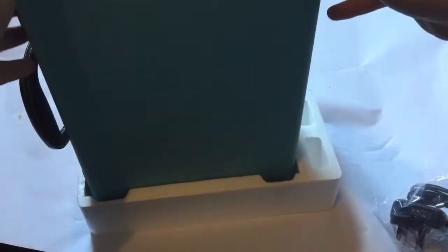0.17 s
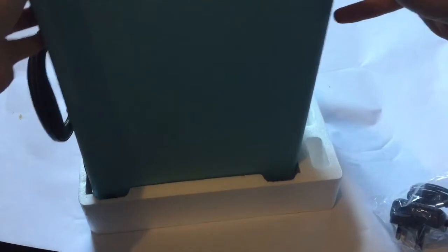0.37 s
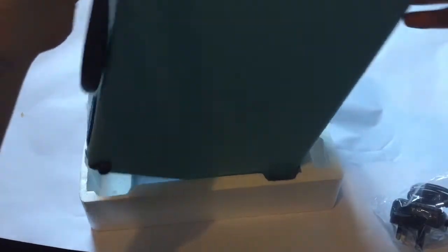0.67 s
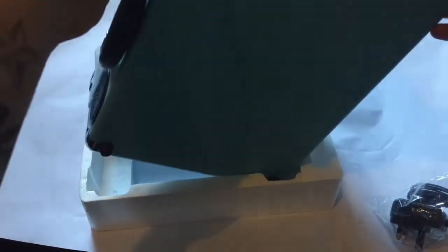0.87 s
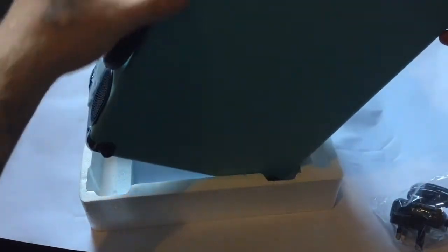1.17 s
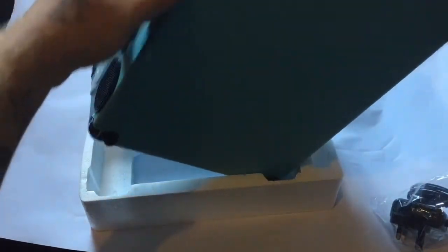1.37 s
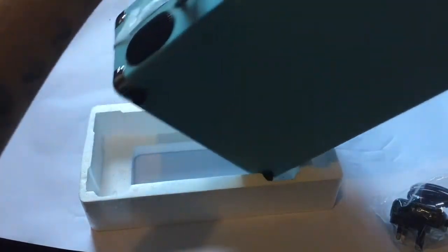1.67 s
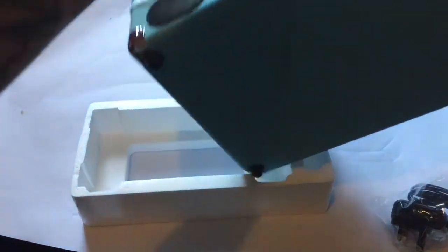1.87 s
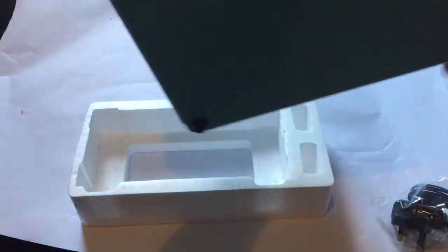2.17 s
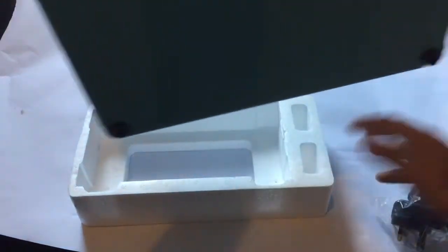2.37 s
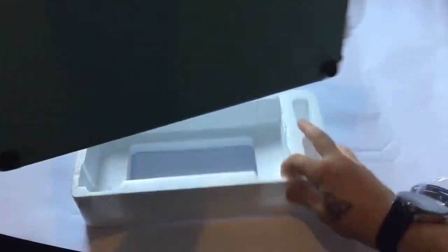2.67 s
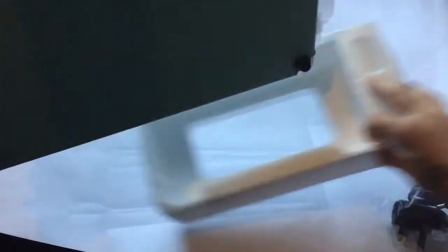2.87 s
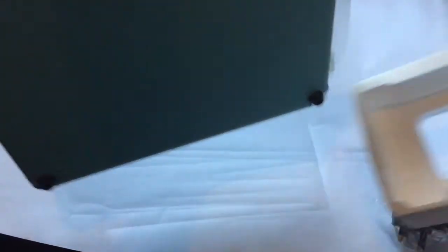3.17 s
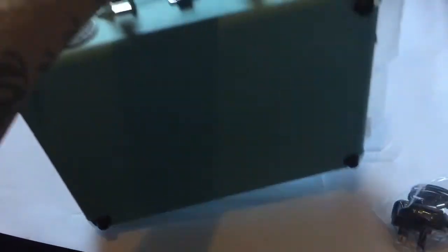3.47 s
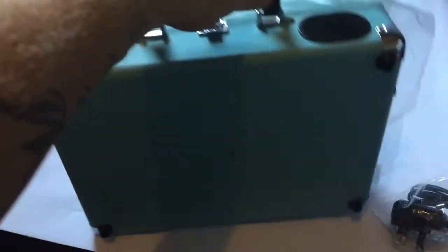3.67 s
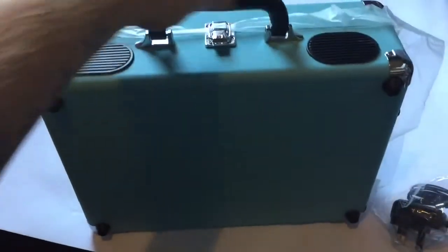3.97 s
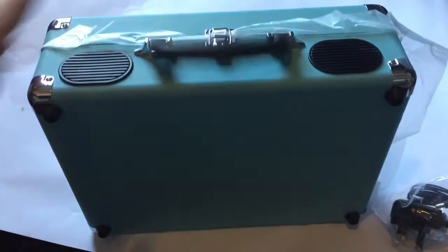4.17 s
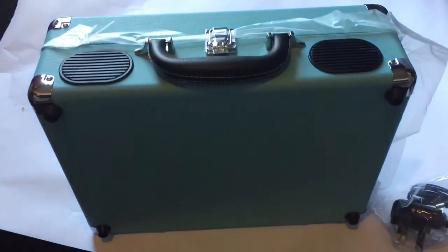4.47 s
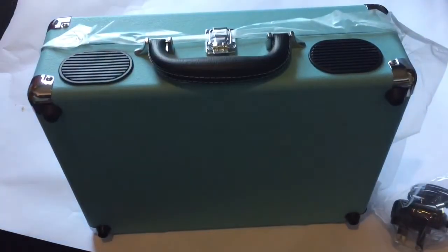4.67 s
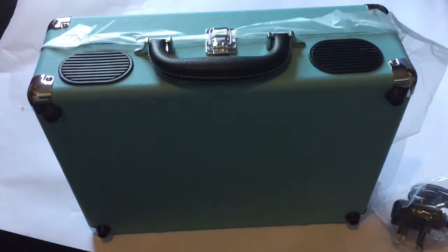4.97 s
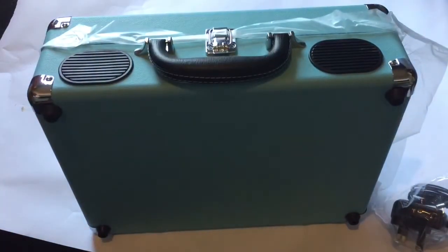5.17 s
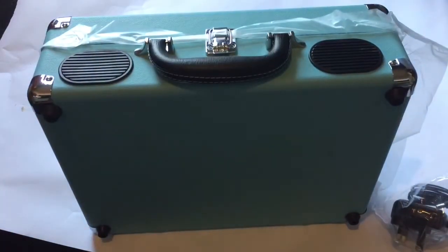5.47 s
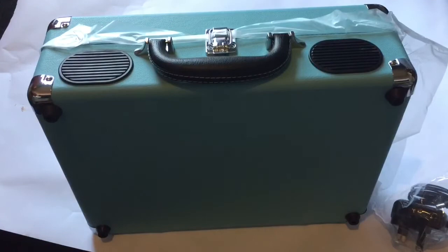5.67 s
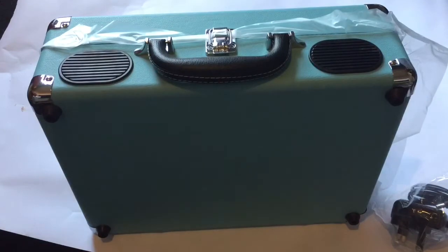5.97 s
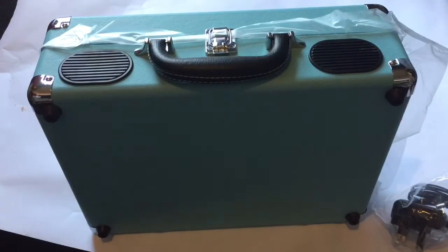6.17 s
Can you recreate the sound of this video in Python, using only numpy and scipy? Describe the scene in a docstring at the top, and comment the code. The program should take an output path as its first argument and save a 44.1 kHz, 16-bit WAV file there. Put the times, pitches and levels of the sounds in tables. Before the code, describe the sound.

Close indoor sound with a short, dull room echo and faint steady bass-heavy noise. Tiny ticks start at once; from 0.3 to 0.8 s a hand sweeps along a hard case, a breathy hiss swelling to about 0.6 s. Low hollow creaks and dry foam rubbing follow from 0.9 to 1.7 s, with bright double cracks near 1.3 and a short knock at 1.5. Around 1.8 to 1.93 s a corner slips free: a loud, piercing squeak, stepping upward and turning raspy. A quieter gap, then a crack, thump and swish near 2.7, a sharp tap at 2.95 and more rubbing. From 3.5 to 4.1 s the case is set down with knocks and a low creaky rumble. At 4.28 s the handle drops with a loud, hard woody clack, rebounding until 4.48. Sparse taps follow, then a soft brush and creak at 5.2 to 5.3, and dull bassy thumps near 5.25 and, stronger, 5.5 s; afterwards only faint noise.

```python
"""A hard case is tilted out of a foam tray on a paper-covered table; small ticks and thumps run throughout.
First a hand sweeps along the case (hiss), the hollow case creaks (slips ring its low modes) and foam rubs (noise).
Then a corner slips free with one loud squeak (harmonics of a gliding slip rate). The case is set down,
its handle drops and bounces (blows ring the case modes), and last come two dull thumps (booms and table modes).
Steady background noise and a short room echo lie around it all."""
import sys
import numpy as np
from scipy import signal
from scipy.fft import rfft, irfft, next_fast_len
from scipy.io import wavfile
from scipy.ndimage import uniform_filter1d

SR = 44100
rng = np.random.default_rng(int(sys.argv[2]) if len(sys.argv) > 2 else 0)


def unload_wav(signal):
    """Save mono or channel-first audio to the path in sys.argv[1] as 16-bit WAV at rate SR, clipped to [-1, 1]."""
    wavfile.write(
        sys.argv[1],
        SR,
        np.round(np.clip(np.atleast_2d(signal).T, -1, 1) * 32767).astype(np.int16),
    )


N = 279153   # length in samples


def from_db(db):
    """Decibels to gain."""
    return 10 ** (np.asarray(db) / 20)


def rms_one(x):
    """Scale to an average strength (rms) of 1."""
    return x / np.sqrt(np.mean(x ** 2) + 1e-20)


def coloured(x, spectrum):
    """Make some pitches of a noise stronger than others, following a spectrum; rms 1."""
    hz, db = np.transpose(spectrum)
    grid = np.maximum(np.fft.rfftfreq(N, 1 / SR), 1)
    shape_db = np.interp(np.log(grid), np.log(hz), db, left=-80, right=-80)
    return rms_one(irfft(rfft(x) * from_db(shape_db), N))


def grains(per_s, spread_db):
    """Random slips in either direction that come in clumps; a spread above 0 makes their sizes uneven; rms 1."""
    sizes = from_db(spread_db * np.minimum(rng.exponential(1, N), 5))
    signs = rng.choice([-1, 1], N)
    clumps = rms_one(uniform_filter1d(rng.standard_normal(N), size=500))
    happens = rng.random(N) < per_s / SR
    return rms_one(sizes * signs * from_db(1.3 * clumps) * happens)


def ring(clicks, hz, t60):
    """A click of height 1 sets off a sine of about height 1 that falls by 60 dB in t60 seconds."""
    r = from_db(-60 / (t60 * SR))
    w = 2 * np.pi * hz / SR
    return signal.lfilter([0, np.sin(w)], [1, -2 * r * np.cos(w), r * r], clicks + 1e-18)


def body(force, modes):
    """One force sets all the modes (natural ringing tones) of an object going."""
    return sum(from_db(db) * ring(force, hz, t60) for hz, db, t60 in modes)


def resonances(x, peaks):
    """Noise passes twice through each of several side-by-side resonances, so the gaps stay dark; rms 1."""
    total = 0
    for k, (hz, width, db) in enumerate(peaks):
        t60 = 1.8 / width
        twice = ring(ring(x, hz, t60), hz, t60)
        total = total + (-1) ** k * from_db(db) * rms_one(twice)
    return rms_one(total)


def burst(low_hz, high_hz, t60):
    """A short band of noise that rises within a millisecond or so and dies away, peak about 1."""
    t = np.arange(8820) / SR
    band = signal.butter(2, [low_hz, high_hz], "band", fs=SR, output="sos")
    noise = signal.sosfilt(band, rng.standard_normal(len(t)))
    return 0.39 * rms_one(noise) * (1 - np.exp(-t / 0.00085)) * from_db(-60 * t / t60)


def add(out, s, sound):
    """Mix a sound in at time s."""
    i = round(s * SR)
    out[i:i + len(sound)] += sound[:N - i]


def strokes(rows):
    """Strokes swell, hold and fade: their summed gain, then the same with each further dB column added."""
    fade_bend = 0.94   # 1 is a straight fade in dB; below 1 it starts steeply and ends more gently
    s, rise, hold, fall, level_db, *shares_db = np.transpose(rows)[:, :, None]
    t = np.arange(0, N + 20, 20) / SR   # every 20th sample is enough
    before = np.maximum((s - t) / rise, 0)
    after = np.maximum((t - s - hold) / fall, 0)
    gain = from_db(level_db - 20 * (before + after ** fade_bend))
    sums = [np.sum(gain * from_db(db), axis=0) for db in [0] + shares_db]
    return [np.interp(np.arange(N) / SR, t, total) for total in sums]


def sheet(x):
    """Thin panels and sheets have many narrow resonances: an unchanging ripple, peaks about 50 Hz wide."""
    ripple_db = 3
    spectrum = rfft(x)
    ripple = rms_one(uniform_filter1d(rng.standard_normal(len(spectrum)), size=300))
    return irfft(spectrum * from_db(ripple_db * ripple), N)


def background():
    """Steady noise, strongest in the bass."""
    # colour of the background: (frequency [Hz], level per Hz [dB])
    floor_colour = [(18, -43), (30, -15.5), (64, -10), (109, -15.5), (131, -14.5), (384, -26), (569, -28),
                    (1220, -32), (1670, -32), (3310, -33.5), (3870, -34.5), (8520, -39), (16000, -46)]
    level_db = -66
    return from_db(level_db) * coloured(rng.standard_normal(N), floor_colour)


def sweep_gains():
    """One long sweep of a hand along the case: gains of hiss, midrange and top octave."""
    # sweep: (time [s], hiss [dB], midrange against it [dB], top octave against it [dB])
    sweep = [(.28, -71, -1, -3), (.305, -64.5, -3, 2), (.47, -47, -10, -3.5), (.55, -40.5, -11.5, -5.5),
             (.625, -36, -8.5, 2.5), (.7, -41.5, -6.5, 2), (.81, -56, -13, 4.5), (.84, -68, 0.5, .2)]
    s, level_db, mid_db, top_db = np.transpose(sweep)
    t = np.arange(N) / SR
    return [from_db(np.interp(t, s, level_db + db, left=-150, right=-150)) for db in (0, mid_db, top_db)]


def rubbing():
    """Dense tiny slips: hiss, top octave and a duller, coarser midrange; on foam they ring its resonances."""
    # hands, paper and plastic wrap sliding; rise and fall are times for 20 dB: (time at full level [s],
    # rise [s], hold [s], fall [s], hiss [dB], midrange against it [dB], top octave against it [dB])
    hand_strokes = [(0.002, 0.011, 0.0009, 0.35, -59.5, 0.5, -5),
                    (.154, .003, 0.00086, 0.018, -53.5, -11, 3),
                    (2.338, .012, 0.0045, 0.018, -51, -3.5, -6),
                    (2.646, 0.0071, 0.08, 0.065, -42.5, -5.5, -5),
                    (3.005, 0.0087, 0.057, .025, -53.5, -13, 2.5),
                    (3.47, 0.0033, 0.00094, 0.17, -63, 3.5, -22),
                    (3.66, 0.042, .01, 0.052, -59.5, 6.5, -10),
                    (3.694, 0.0067, 0.047, .12, -52.5, 13, -10.5),
                    (3.8, 0.027, .001, 0.089, -48.5, 8, -6.5), (3.922, 0.0036, .001, 0.11, -56, 7, -9),
                    (4.07, 0.062, 0.0011, 0.06, -64, 1, -7), (4.182, .013, 0.00096, 0.14, -65.5, 6.5, -9.5),
                    (4.57, 0.0045, .001, 0.14, -57.5, 5, -12.5), (4.9, .003, 0.0009, 0.046, -55, 4.5, -29),
                    (5.148, 0.025, .001, 0.071, -53, 0, -22), (5.284, 0.12, 0.0013, 0.11, -45.5, 0.8, -9.5),
                    (5.476, 0.081, 0.071, 0.15, -60, 7.5, -9)]
    # foam dragging on case and paper: (time at full level [s], rise [s], hold [s], fall [s],
    # level [dB], low resonances against it [dB])
    foam_rubs = [(1.116, 0.015, 0.036, 0.12, -42, -4), (1.252, 0.085, .001, 0.075, -36, -8),
                 (1.36, 0.0058, .001, 0.2, -63, 6.5), (1.588, 0.053, .032, 0.054, -42.5, 0.5),
                 (1.708, 0.021, 0.074, .03, -53, -6), (1.93, 0.0054, 0.039, 0.08, -32, -14),
                 (2.822, 0.015, 0.041, 0.029, -52, -8), (2.975, 0.0092, 0.1, 0.03, -51.5, -3),
                 (3.137, 0.028, 0.037, 0.04, -64.5, 6)]
    # colours of the sliding noise: (frequency [Hz], level per Hz [dB])
    hiss_colour = [(1800, -27.5), (2500, -3.5), (4000, 1), (6000, 2.5), (8000, 3), (9500, -20.5),
                   (10500, -29)]
    top_colour = [(8000, -6.5), (9200, 3.5), (10400, -4), (11500, 3), (16000, -4)]
    mid_colour = [(300, -7), (550, -12), (1100, -5.5), (1700, -6), (2500, -6.5), (3600, -18)]
    # colour of the foam noise: (frequency [Hz], level per Hz [dB])
    foam_colour = [(2000, -29.5), (2800, 0), (5000, -2.5), (8000, -8.5), (12000, -10.5), (16000, -15.5)]
    # high and low resonances of the foam: (frequency [Hz], rough width [Hz], level [dB])
    foam_high = [(3080, 330, 2), (4400, 250, -12), (5295, 220, -6.5), (6280, 590, -4.5), (7800, 1900, -6.5),
                 (9300, 980, -9.5)]
    foam_low = [(1101, 430, -0.5), (1360, 490, -2.5), (1908, 420, -2), (2381, 370, -7)]

    slips = sheet(grains(9000, spread_db=0.0))
    coarse = sheet(grains(2300, spread_db=0.5))
    gain, mid, top = np.add(strokes(hand_strokes), sweep_gains())
    sliding = gain * coloured(slips, hiss_colour)
    sliding += top * coloured(slips, top_colour)
    sliding += mid * coloured(coarse, mid_colour)
    foam_gain, low_gain = strokes(foam_rubs)
    foam = from_db(-3.5) * resonances(slips, foam_high) + from_db(-4) * coloured(coarse, foam_colour)
    return sliding + foam_gain * foam + low_gain * resonances(np.gradient(coarse), foam_low)


def creaks():
    """Hands work the hollow case: uneven slips at its joints ring its low modes; the grip damps them at once."""
    # creaks: (time at full level [s], rise by 20 dB [s], hold [s], fall by 20 dB [s], level [dB])
    creak_strokes = [(.648, 0.049, .001, 0.16, -42.5), (.908, 0.022, .001, 0.02, -48.5),
                     (.97, 0.013, 0.0009, 0.097, -48), (1.104, .01, .001, 0.14, -45.5),
                     (1.2, .02, .001, 0.31, -62), (1.366, 0.035, 0.02, .3, -44.5),
                     (1.528, 0.028, .001, 0.051, -43), (1.8, 0.011, 0.0004, 0.19, -59),
                     (2.01, 0.21, 0.0009, 0.046, -53), (2.164, 0.017, 0.0011, 0.063, -47.5),
                     (2.246, 0.024, 0.00087, 0.31, -58), (2.52, 0.049, 0.0011, 0.1, -64),
                     (2.736, 0.12, .001, 0.02, -49.5), (3.036, 0.12, 0.00088, 0.17, -49.5),
                     (3.268, 0.027, .001, 0.033, -61), (3.468, 0.0069, .13, 0.071, -45),
                     (3.648, 0.038, 0.0011, 0.043, -37), (3.776, 0.069, 0.0008, 0.1, -28),
                     (3.934, .1, .001, 0.13, -48.5), (4.05, .06, 0.19, 0.17, -60),
                     (4.52, .05, 0.068, 0.092, -59), (5.226, 0.011, 0.03, .1, -35)]
    # low modes of the hollow case: (frequency [Hz], level [dB], time to fall 60 dB [s])
    hollow_modes = [(170.9, -10.5, 0.2), (209.8, -1.5, 0.14), (244.6, 0.5, .2), (290.6, -4, 0.022),
                    (327, -11, .12), (528, -15.5, 0.28), (750, -17.5, 0.089)]
    gain, = strokes(creak_strokes)
    soften = signal.butter(2, [110, 800], "band", fs=SR, output="sos")
    slips = signal.sosfilt(soften, grains(110, spread_db=3.0))
    return gain * rms_one(body(slips, hollow_modes))


def thumps():
    """Soft contacts: a boom that dies in a set number of cycles, and a jolt of noise into the table's modes."""
    # thumps through the table: (time [s], boom level [dB], boom frequency [Hz], woody knock against it [dB])
    contacts = [(0.303, -46.5, 72, -15), (1.036, -53, 65.6, -12), (1.527, -23, 660, -10.5),
                (2.717, -39.5, 64, -10), (2.724, -35.5, 111, -4), (3.918, -38, 548, 9.5),
                (5.224, -46, 96.7, 14), (5.246, -41, 95.3, 8), (5.272, -37.5, 101, -1),
                (5.478, -26, 89.7, 4), (5.497, -26.5, 87.3, -2), (5.537, -27.5, 91.8, -6)]
    # modes of the table: (frequency [Hz], level [dB], time to fall 60 dB [s])
    table_modes = [(137.6, -10, 0.19), (213.5, 2.5, 0.13), (299, -4.5, 0.039), (376, -3, 0.12),
                   (459, 0, 0.043), (594, -1.5, 0.13), (660, -12, 0.14), (973, -10.5, 0.052),
                   (1075, -4.5, 0.029)]
    boom, force = np.zeros(N), np.zeros(N)
    t = np.arange(13230) / SR
    for s, level_db, hz, knock_db in contacts:
        envelope = from_db(level_db - 3.04 * t * hz) * (1 - np.exp(-t / 0.0015))   # loses 3.04 dB per cycle
        add(boom, s, envelope * np.sin(2 * np.pi * hz * t))
        add(force, s, from_db(level_db + knock_db - 26) * burst(103, 1570, t60=0.039))
    return boom + body(force, table_modes)


def ticks():
    """Small taps: a bright crack, a duller knock and a short ring at the pitch of whatever was touched."""
    # ticks and taps: (time [s], level before each layer's offset [dB], ring [Hz], low knock against it [dB])
    taps = [(0.0308, -35, 2800, -14.5), (0.075, -43, 1740, -13), (.093, -46, 2100, -8),
            (0.154, -52, 3330, -28), (0.258, -47.5, 1600, -5.5), (0.8115, -41.5, 2290, -14),
            (1.28, -26.5, 3230, -12.5), (1.2982, -28, 3020, -9), (1.341, -37.5, 1340, 2.5),
            (1.355, -35.5, 1240, 6), (1.5223, -44.5, 790, 14.5), (2.7189, -24, 2950, -6.5),
            (2.9571, -22, 1040, -13), (3.044, -31.5, 1076, -3), (3.132, -43, 974, 2),
            (3.26, -37, 1122, -14), (3.485, -37.5, 757, -9), (3.5862, -42, 1237, -24),
            (3.6301, -33.5, 768, -4.5), (3.6922, -43.5, 1640, 16), (3.7377, -39.5, 980, 17.5),
            (3.797, -27.5, 1390, -3), (3.8063, -32, 1100, 16), (3.915, -42, 2040, 19),
            (3.9487, -30.5, 1085, -5.5), (4.028, -51, 1640, 9.5), (4.062, -40, 1145, -3),
            (4.138, -38.5, 1110, -4), (4.1669, -53.5, 1516, 19.5), (4.4968, -49, 1195, 17.5),
            (4.569, -38.5, 1103, 0), (4.8719, -45, 1173, -8.5), (4.8981, -34.5, 2580, -5),
            (4.9996, -50.5, 2730, -2), (5.1419, -33, 3370, -12), (5.228, -33, 1040, -9),
            (5.275, -39, 1130, -26), (5.4269, -51.5, 2350, 1), (5.457, -38, 970, -12)]
    ring_cycles = 130   # cycles until the ring is 60 dB down
    out = np.zeros(N)
    for s, level_db, hz, knock_db in taps:
        add(out, s, from_db(level_db + 3) * burst(2160, 7600, t60=0.025))
        add(out, s, from_db(level_db - 10) * burst(12000, 18600, t60=0.0089))
        add(out, s, from_db(level_db + knock_db + 5.5) * burst(420, 2000, t60=0.032))
        narrow = burst(hz / 1.07, hz * 1.07, t60=ring_cycles / hz)
        add(out, s, from_db(level_db + knock_db / 2) * narrow)
    return out


def handle():
    """The handle drops and bounces: blows and loose rattle ring the case modes, with a woody tail and a crack."""
    # blows: (time [s], level before each layer's offset [dB], crack against it [dB])
    blows = [(4.26, -28.5, -5.5), (4.268, -13, -5.5), (4.283, 4, -11), (4.302, -22.5, -27.5),
             (4.344, -18.5, -10.5), (4.387, -4.5, -17.5), (4.407, -17, -7), (4.444, -13.5, -12),
             (4.477, -26.5, -11)]
    # modes of the case: (frequency [Hz], level [dB], time to fall 60 dB [s])
    case_modes = [(239, -15.5, 0.16), (561.5, -15, 0.025), (703, -11, 0.027), (910, -22, 0.051),
                  (1118, -15, 0.057), (1205, 2.5, .035), (1335, 2.5, 0.03), (1243, -10.5, 0.14),
                  (1360, -20.5, 0.45), (1654, -10.5, 0.12), (1710, -16.5, 0.14), (2304, -14.5, 0.03),
                  (2730, -16, 0.041), (3104, -13.5, .025), (3737, -19.5, 0.02)]
    out, rattle = np.zeros(N), np.zeros(N)
    for s, level_db, crack_db in blows:
        add(rattle, s, from_db(level_db - 35.5) * burst(300, 3600, t60=0.048))
        add(out, s, from_db(level_db - 28.5) * burst(680, 4000, t60=0.2))   # woody tail
        add(out, s, from_db(level_db + crack_db) * burst(1600, 9000, t60=0.015))
        add(out, s, from_db(level_db + crack_db - 7.5) * burst(9000, 20000, t60=0.013))
    at = [round(row[0] * SR) for row in blows]
    blow_db = np.array(blows)[:, 1]
    for k, (hz, db, t60) in enumerate(case_modes):
        clicks = from_db(db) * rattle
        sign = (-1) ** k   # neighbours start in opposite directions, so that they beat
        clicks[at] += sign * from_db(blow_db + db - 9 + rng.normal(0, 1, len(at)))
        out += ring(clicks, hz, t60)
    return out


def squeak():
    """The corner sticks and slips in the foam: harmonics of the slip rate; roughness jitters and adds scrape."""
    # course of the squeak: (time [s], slips per second [Hz], level [dB], roughness [0 smooth, 1 full])
    course = [(1.694, 1250, -65, 0.96), (1.71, 1140, -46.5, 0.75), (1.745, 1100, -45, .9),
              (1.78, 910, -49, .9), (1.784, 1470, -46.5, 0.39), (1.807, 1310, -42, 0),
              (1.812, 1375, -24.5, .25), (1.82, 1365, -14, 0.2), (1.822, 1250, -12.5, 0.2),
              (1.845, 1235, -10.5, .35), (1.847, 1395, -9.5, 0.1), (1.88, 1495, -9.5, 0.2),
              (1.882, 1620, -12, .55), (1.891, 1750, -11.5, .8), (1.894, 2100, -14, .9),
              (1.901, 2350, -9, 0.1), (1.911, 2370, -13, 0.8), (1.914, 2000, -13.5, 0.9),
              (1.927, 2600, -17.5, 1.1), (1.935, 2070, -27, .6), (1.955, 2360, -34, .6),
              (1.972, 2330, -62, .95)]
    # how the foam colours the harmonics: (frequency [Hz], level [dB])
    harmonic_colour = [(900, -27.5), (1250, -16), (1450, -5), (2400, -2.5), (3000, -12.5), (4200, -2.5),
                       (5000, -12.5), (5800, 2), (7200, -7.5), (8700, -3.5), (10000, -7.5), (11300, -1.5),
                       (12500, -17), (16000, -14.5)]
    # colour of the scraping noise: (frequency [Hz], level per Hz [dB])
    scrape_colour = [(1000, -41), (1400, -5.5), (3000, -1.5), (6000, 4.5), (11000, -3.5), (16000, -3.5)]
    # No tilt at flat_db; softer, harmonics lose dB per octave for each dB, less so when rough.
    flat_db, tilt_per_db, rough_brightens = -11, 0.33, 0.48

    s, *columns = np.transpose(course)
    first, last = round(s[0] * SR), round(s[-1] * SR)
    t = np.arange(first, last) / SR
    rate, level_db, rough = (np.interp(t, s, c) for c in columns)
    tilt_db = tilt_per_db * (level_db - flat_db) * (1 - rough_brightens * rough)
    rough = np.clip(rough, 0, 1)

    # One slow noise jitters the slip rate; 13 more let the harmonics waver in level.
    slow = uniform_filter1d(rng.standard_normal((14, len(t))), size=150, axis=1) * np.sqrt(150)
    jitter, waver = slow[0], slow[1:]
    jittered_rate = rate * (1 + 0.085 * rough ** 1.3 * jitter)
    phase = 2 * np.pi * np.cumsum(jittered_rate) / SR
    k = np.arange(1, 14)[:, None]   # harmonic numbers
    hz, db = np.transpose(harmonic_colour)
    colour_db = np.interp(np.log(k * rate), np.log(hz), db, right=-80)
    heights = from_db(colour_db + tilt_db * np.log2(k) + (1 + 0.27 * k) * waver)
    rasp = uniform_filter1d(rng.standard_normal((13, len(t))), size=40, axis=1) * np.sqrt(40)
    heights *= 1 + 0.4 * rough * rasp   # uneven slips smear each harmonic

    tone = np.sum(heights * np.sin(k * phase + rng.normal(0, 1.0, k.shape)), axis=0)
    tone /= np.sqrt(uniform_filter1d(np.sum(heights ** 2, axis=0), size=200) / 2)   # even out the strength
    scrape = coloured(rng.standard_normal(N), scrape_colour)[first:last]
    mix = np.sqrt(1 - rough ** 2) * tone + rough * from_db(tilt_db) * scrape
    out = np.zeros(N)
    out[first:last] = from_db(level_db) * mix
    return out


def room(x):
    """Room echo: eight delays of 7 to 31 ms feed back into themselves, duller on every round."""
    t60_s, wall_cut_hz = 0.12, 2200   # bass dies by 60 dB in t60_s, treble sooner
    size = next_fast_len(N + SR)
    w = 2 * np.pi * np.fft.rfftfreq(size)   # radians per sample
    dull = 1 / (1 + 1j * w * SR / (2 * np.pi * wall_cut_hz))
    echoes = 0
    for k, lag in enumerate(np.geomspace(0.007, 0.031, num=8) * SR):
        once = from_db(-60 * lag / SR / t60_s) * dull * np.exp(-1j * w * round(lag))
        echoes = echoes + (-1) ** k * once / (1 - once)   # sum of all rounds
    return irfft(rfft(x, size) * echoes, size)[:N]


def scene():
    """All near sources without their deepest bass, their room echo and the steady background."""
    room_db = -14.5
    near = rubbing() + creaks() + thumps() + ticks() + handle() + squeak()
    near = signal.sosfilt(signal.butter(3, 60, "high", fs=SR, output="sos"), near)
    return (near + from_db(room_db) * room(near) + background())[None]


def record(dry):
    """Round off the loudest peaks and cut the very top of the treble."""
    cutoff_hz = 15850
    rounded = 1.3 * np.tanh(dry / 1.3)
    return signal.sosfilt(signal.ellip(10, 0.2, 65, cutoff_hz, fs=SR, output="sos"), rounded)


dry = scene()
out = record(dry)
unload_wav(out)
```